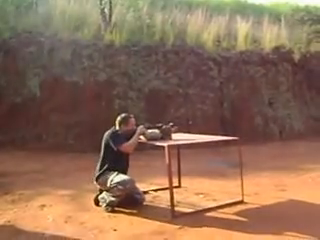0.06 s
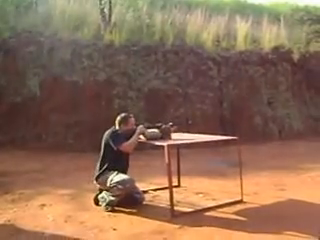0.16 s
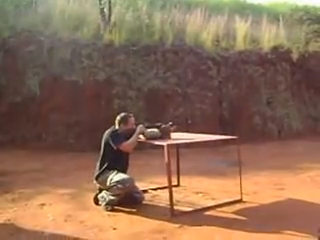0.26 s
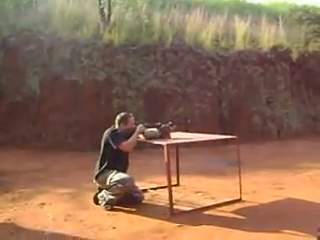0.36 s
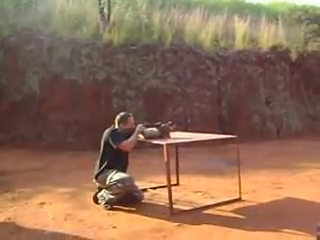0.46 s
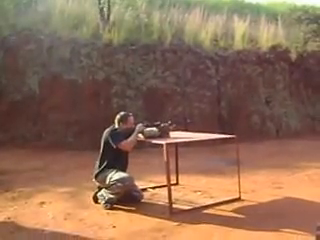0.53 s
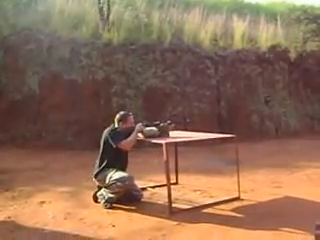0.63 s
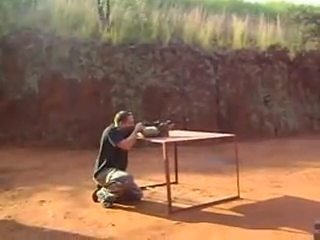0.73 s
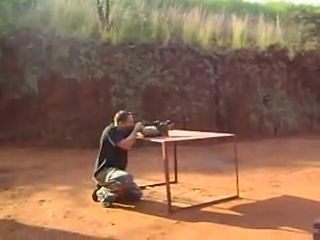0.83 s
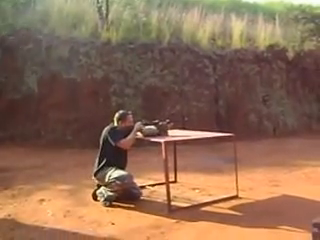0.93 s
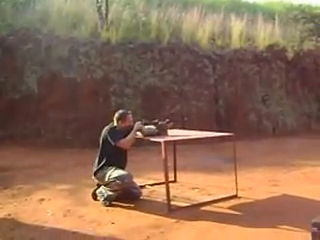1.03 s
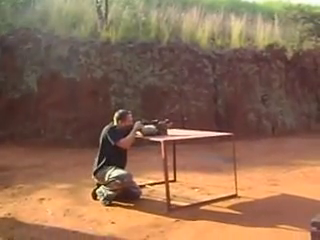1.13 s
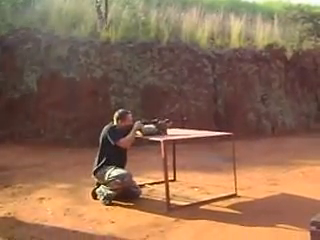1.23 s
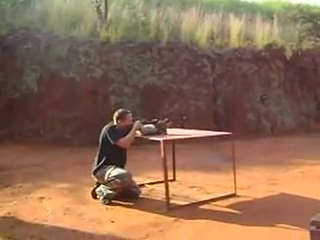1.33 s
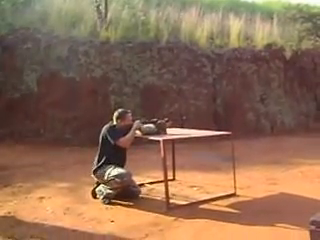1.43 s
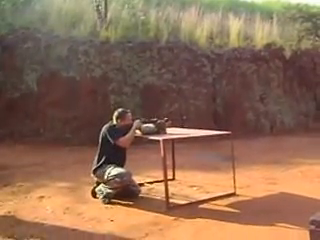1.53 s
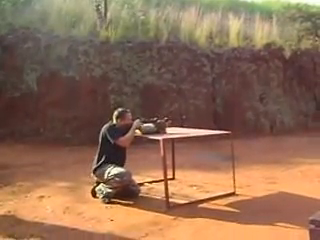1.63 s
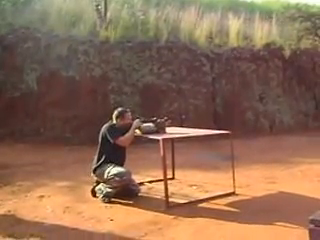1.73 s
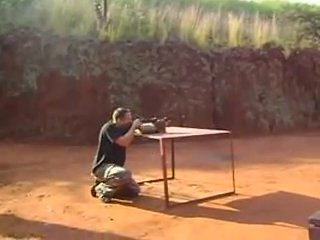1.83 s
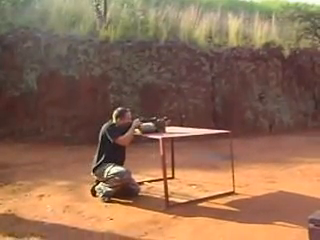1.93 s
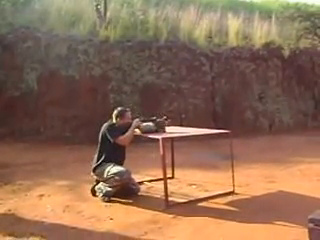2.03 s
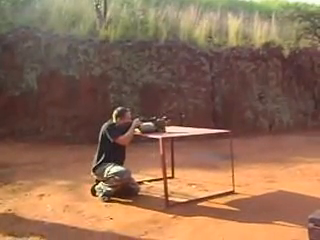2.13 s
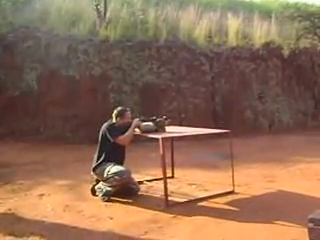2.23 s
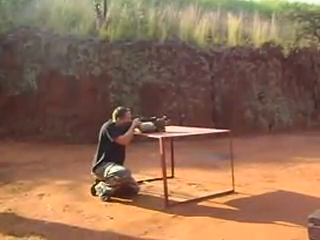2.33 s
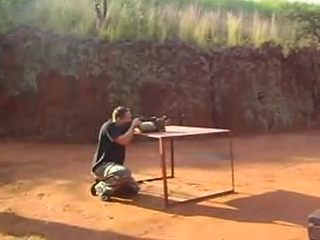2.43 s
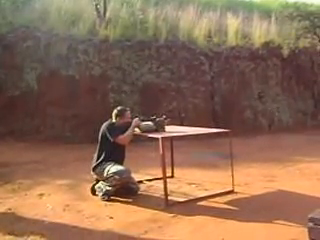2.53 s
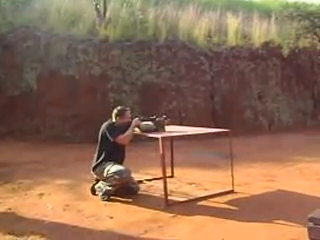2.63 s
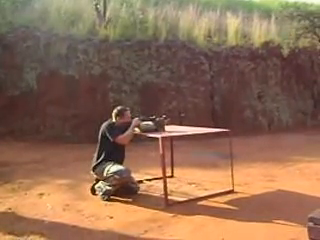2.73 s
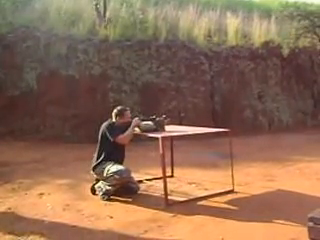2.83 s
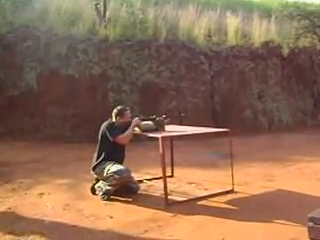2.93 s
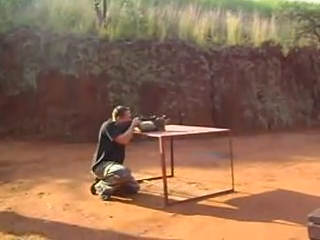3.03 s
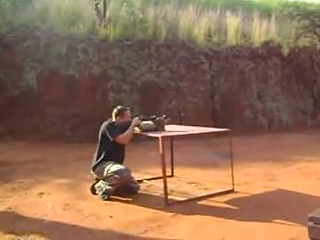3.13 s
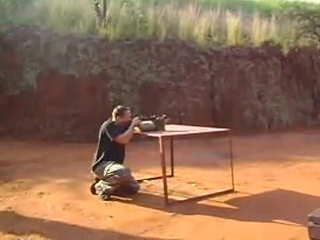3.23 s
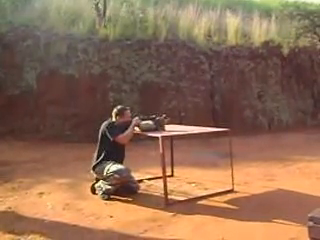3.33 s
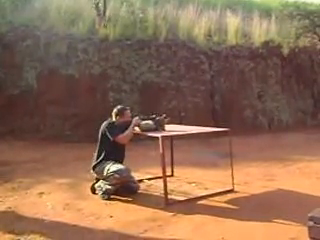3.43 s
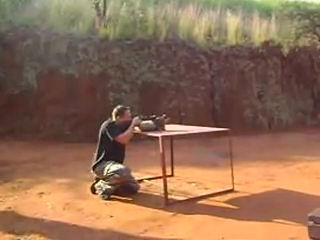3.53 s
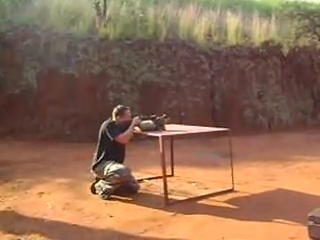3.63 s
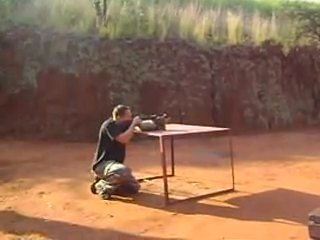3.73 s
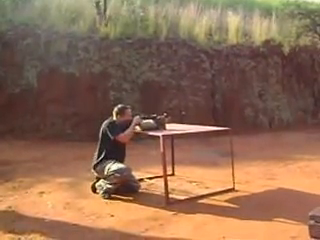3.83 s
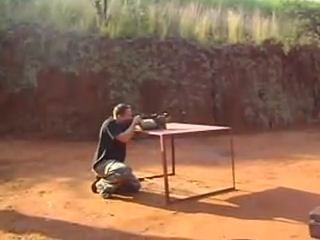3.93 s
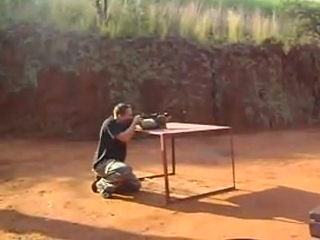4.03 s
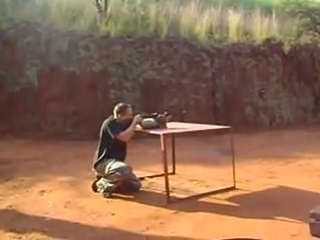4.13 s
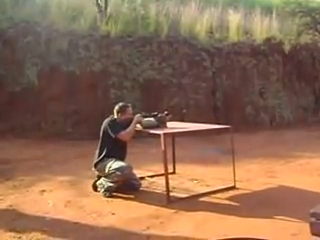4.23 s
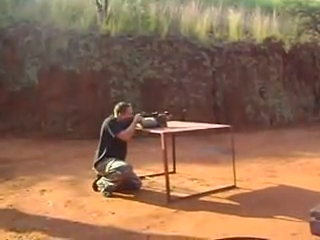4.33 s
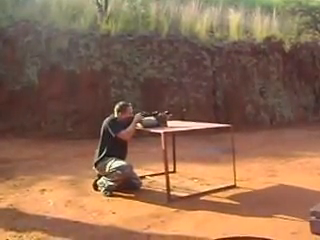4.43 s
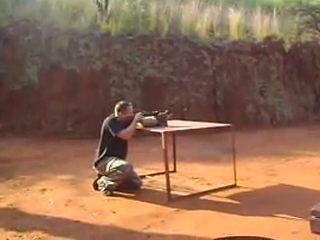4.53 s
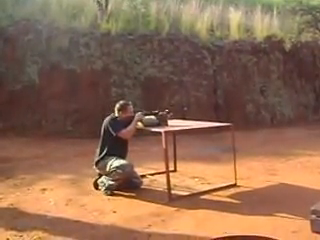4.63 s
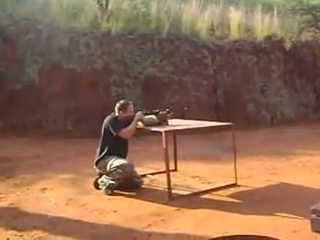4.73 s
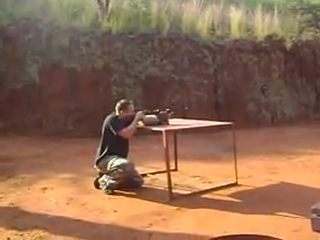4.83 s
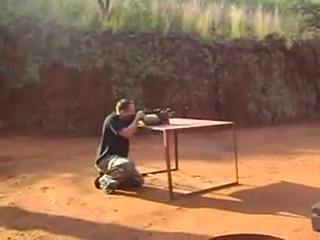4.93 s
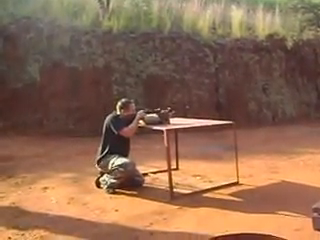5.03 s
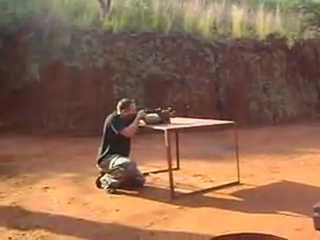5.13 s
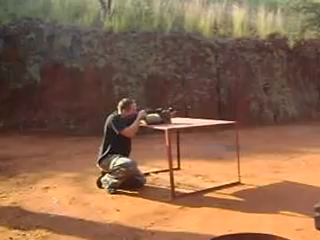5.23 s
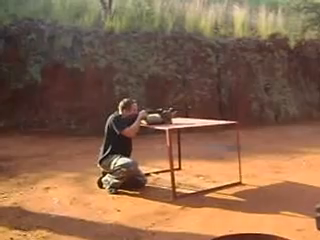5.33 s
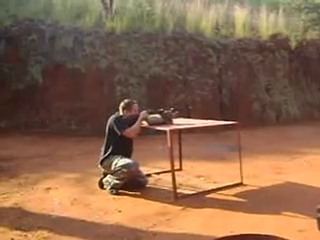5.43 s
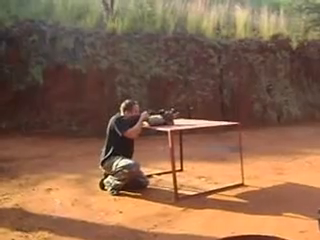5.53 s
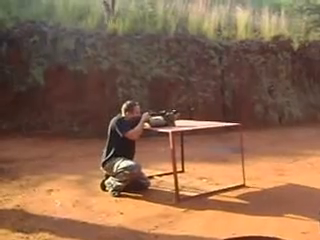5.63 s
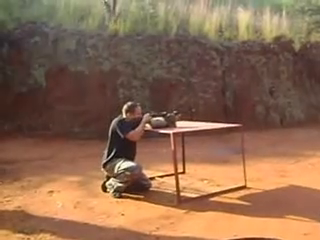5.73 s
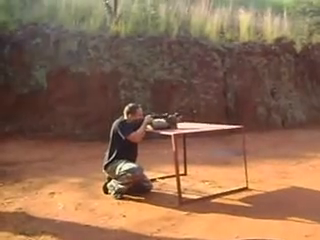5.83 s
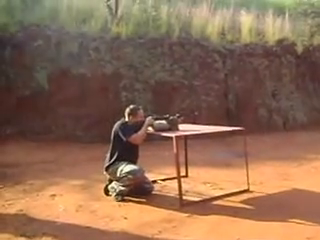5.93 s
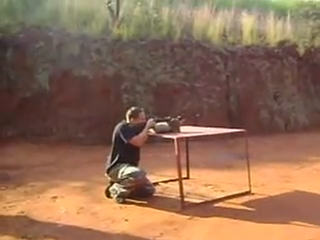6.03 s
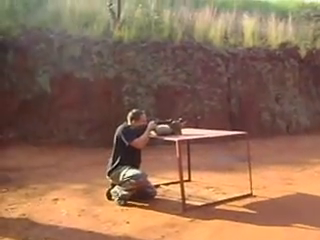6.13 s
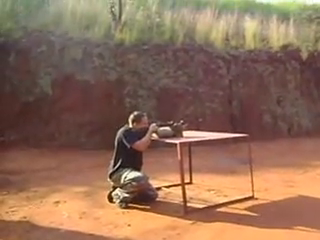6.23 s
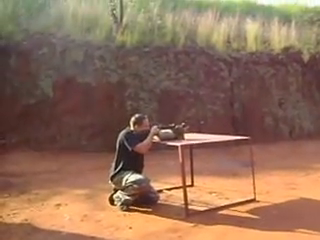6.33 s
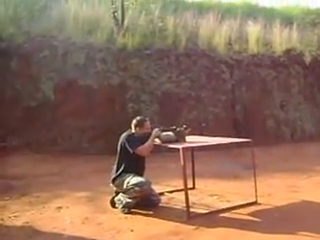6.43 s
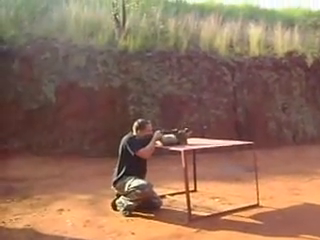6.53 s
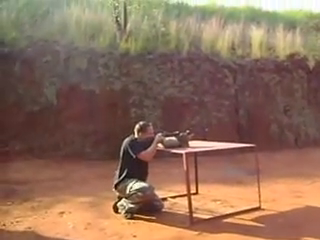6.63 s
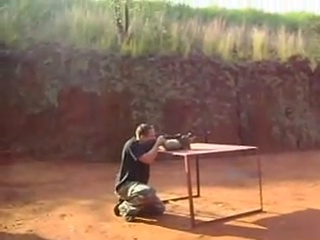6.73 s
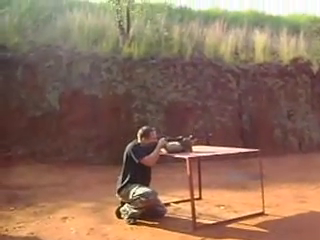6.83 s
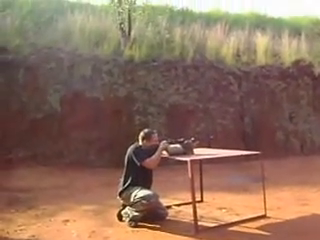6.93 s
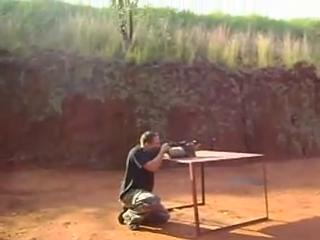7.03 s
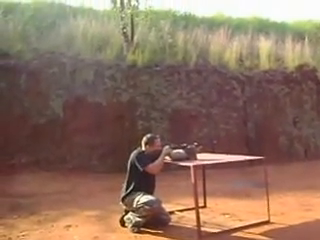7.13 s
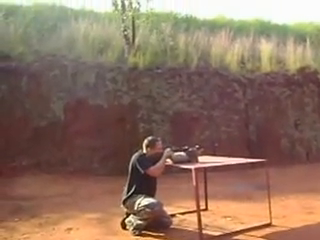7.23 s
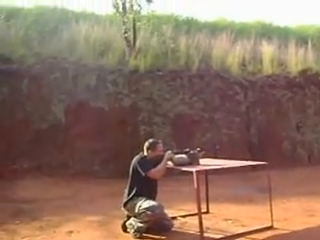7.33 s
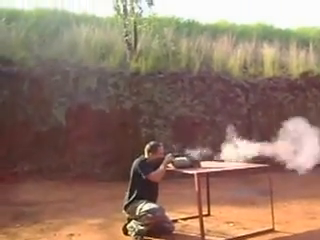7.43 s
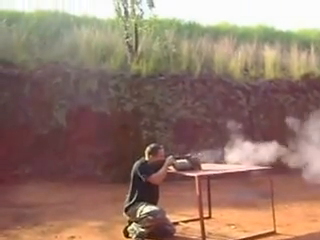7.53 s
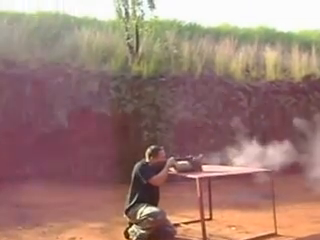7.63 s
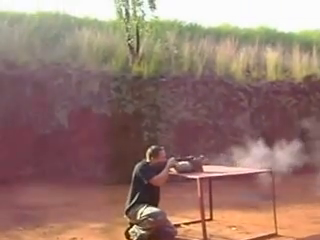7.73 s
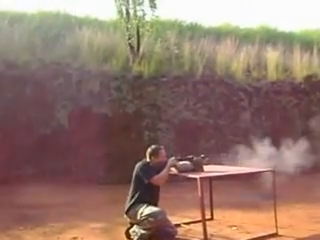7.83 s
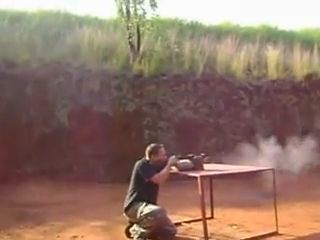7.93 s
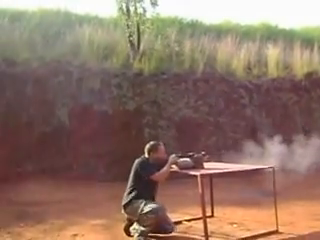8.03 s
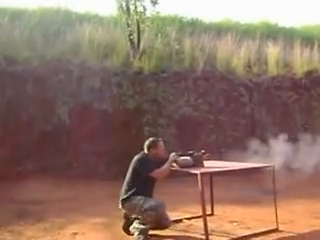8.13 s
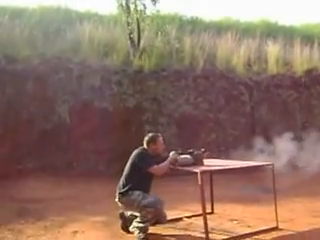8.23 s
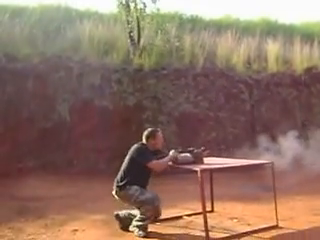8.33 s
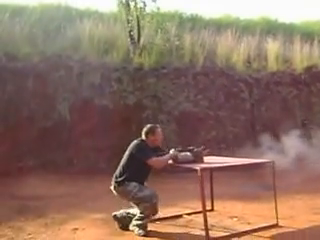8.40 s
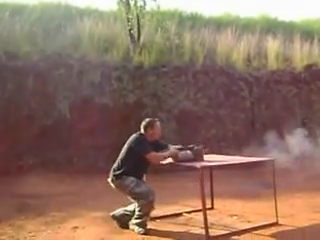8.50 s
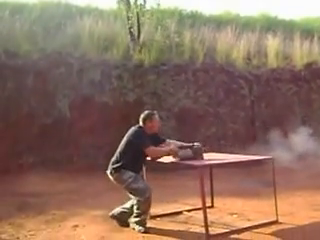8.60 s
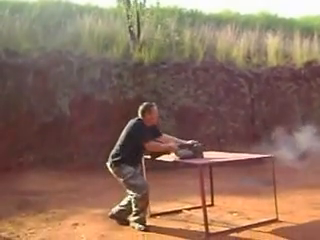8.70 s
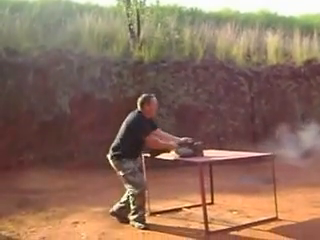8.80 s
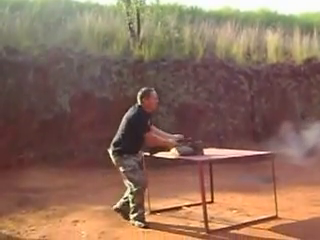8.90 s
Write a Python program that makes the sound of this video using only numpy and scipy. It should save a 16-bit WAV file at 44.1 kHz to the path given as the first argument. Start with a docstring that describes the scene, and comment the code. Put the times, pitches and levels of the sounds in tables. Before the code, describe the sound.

Outdoors, soft steady hiss with a far-off dove repeating a three-part coo about every one and a half seconds. A brief dry chuff sounds close by at the start. After a long quiet wait, one black-powder rifle shot bursts out extremely loud, clipped by a small narrow-band microphone, with tight echoes off an earth bank and a rolling boom that dies away. Dull scuffs follow as the shooter rises.

```python
"""A far-off dove coos over steady hiss, and a short dry chuff sounds near the start.
Then a black-powder rifle is fired once on an open range in front of a high earth bank, and its boom rolls
over the land; scuffing follows as the shooter gets up. Coos are frequency-modulated sines, the chuff and
scuffs are shaped noise, and the shot sums pressure fronts, scattered noise and resonances.
The blast and its echoes overload a small, narrow-band microphone input."""
import sys
import numpy as np
from scipy import signal
from scipy.fft import rfft, irfft, next_fast_len
from scipy.io import wavfile

SR = 44100
rng = np.random.default_rng(int(sys.argv[2]) if len(sys.argv) > 2 else 0)


def generate_wav(signal):
    """Clip the signal to [-1, 1] and save it as 16-bit WAV at the path in sys.argv[1]."""
    frames = np.transpose(np.atleast_2d(signal))
    scaled = np.clip(frames, -1, 1) * 32767
    pcm = np.round(scaled).astype(np.int16)
    wavfile.write(sys.argv[1], SR, pcm)


N = 395224   # length in samples

# Spectrum of still air and microphone hiss. Each row: frequency in Hz, relative density in dB per Hz.
HISS_SPECTRUM = [(25, 5), (70, 6.5), (130, -2), (250, 0.5), (500, 0.5), (820, 3.5), (1300, -0.5),
                 (2500, -2.5), (4800, -4), (5400, -10), (6200, -10.5)]
HISS_DB = -63.5
# Spectrum of the low drone. Each row: frequency in Hz, relative density in dB per Hz.
DRONE_SPECTRUM = [(50, -24.5), (63, -17), (70, 11), (79, -13), (97, 0), (115, -18), (160, -35.5)]
# Swells of the drone. Each row: crest in seconds, half width (to 1/e) in seconds, level in dB.
DRONE_SWELLS = [(.1, 0.77, -80), (3.8, 0.96, -75), (6.15, 0.34, -76.5)]

# The dove's phrases. Each row: starts of long coo, rolled note and short coo in seconds, level in dB.
DOVE_PHRASES = [(-.38, 0.055, .555, -60.5), (1.024, 1.471, 1.961, -58), (2.438, 2.859, 3.334, -58),
                (3.81, 4.247, 4.734, -57.5), (5.236, 5.64, 6.142, -56.6), (6.633, 7.086, 7.6, -56),
                (8.047, 8.485, 8.97, -58.5)]
# The plain notes are arches in pitch: length, top, fall at the end.
LONG_COO_S, LONG_TOP_HZ, LONG_FALL_HZ = .102, 912, 211
SHORT_COO_S, SHORT_TOP_HZ, SHORT_FALL_HZ = .066, 858, 110
# The rolled note lasts until a brief pause before the short coo.
PURR_HZ, PURR_PAUSE_S = 885, .095
PURR_DB, SHORT_COO_DB = -0.1, 1.6   # relative to the phrase
PITCH_RISE_PER_S = .005   # share by which the song creeps up in pitch, phrase by phrase

# Spectrum of the dry chuff close by. Each row: frequency in Hz, relative density in dB per Hz.
CHUFF_SPECTRUM = [(150, -36), (320, -25), (490, -6.5), (610, -10.5), (780, 2.5), (930, -1.5), (1050, -9.5),
                  (1280, -16.5), (1580, -2), (2500, -8), (2850, -13), (3700, -12), (5200, -13.5),
                  (6300, -21)]
# Thin metallic ring that outlasts the chuff. Each row: frequency in Hz, relative density in dB per Hz.
CHUFF_RING_SPECTRUM = [(2800, -35), (3080, -25), (3180, -3), (3300, -18), (3700, -7), (3850, -4),
                       (4100, -22), (4800, -35)]
# The chuff sets in quickly, holds and dies away.
CHUFF_S, CHUFF_DB, CHUFF_ATTACK_S, CHUFF_HOLD_S, CHUFF_T60_S = 0.15, -32.5, 0.0042, 0.024, 0.23

# Sound scattered by the bank. Each row: frequency in Hz, relative density in dB per Hz.
SCATTER_SPECTRUM = [(25, -15.5), (70, -20), (140, 4), (230, 1), (330, 2), (460, -3), (720, 3.5), (1200, 0),
                    (1550, -5), (2000, -6), (2800, -11), (4700, -14.5), (6000, -24.5)]
# Booming modes of the hollow between bank and ground. Each row: frequency in Hz, relative level in dB,
# decay time t60 in seconds.
HOLLOW_MODES = [(134, -7, 0.33), (171, -2, 0.29), (214, 2.5, 0.29), (316, -10.5, 0.38)]
# The muzzle blast and the time its scatter takes to die.
SHOT_S, SHOT_DB, SHOT_T60_S = 7.525, 10.5, 0.42
# Returns of the blast from the bank and a far wall. Each row: arrival in seconds, level in dB.
ECHOES = [(7.567, 8), (7.5975, -1.1), (7.622, -1.3), (7.663, -2.5), (7.6823, -5), (7.694, -5),
          (7.758, -18.5)]
ECHO_T60_S, ECHO_BASS_T60_S = .058, .17
# Every arrival has a front and a boom, in proportion to its strength.
FRONT_DB, FRONT_S, BOOM_DB = 9.5, .00024, -12.5
# Relative bass of the direct blast, and how its share grows with the delay of a return.
BASS_DB, BASS_DB_PER_S = -6, 50.5

# Spectrum of the far rolling boom. Each row: frequency in Hz, relative density in dB per Hz.
ROLL_SPECTRUM = [(25, -8), (70, -10.5), (130, -10), (220, -4.5), (330, -4), (560, -6), (820, 2),
                 (1100, -2.5), (1500, -8), (1850, -5.5), (2600, -9.5), (4500, -13), (6000, -24)]
# Boom from the land around: lag behind the shot, swell, decay, level.
ROLL_LAG_S, ROLL_RISE_S, ROLL_T60_S, ROLL_DB = 0.12, .017, 1.251, -18

# The clearest scuffs as the shooter rises. Each row: start in seconds, level in dB.
CLEAR_SCUFFS = [(8.405, -47), (8.427, -46.5), (8.452, -46), (8.485, -44), (8.499, -45)]
# Spectrum of the scuffs. Each row: frequency in Hz, relative density in dB per Hz.
SCUFF_SPECTRUM = [(100, -10), (400, -16), (620, -5), (830, 4.5), (1050, -4.5), (1450, -13.5), (1850, -5.5),
                  (2300, -27), (3200, -24), (5000, -46)]
SCUFF_T60_S = 0.17
SMALL_SCUFFS_PER_S, SMALL_SCUFF_DB = 19, -58   # lighter scuffs, mean rate and mean level

CUTOFF_HZ = 15700   # upper limit of the finished sound


def from_db(db):
    """A level in decibels is twenty times the logarithm of an amplitude ratio."""
    return 10 ** (np.asarray(db) / 20)


def rms_one(x):
    """Normalization: dividing by the root mean square gives unit rms."""
    return x / np.sqrt(np.mean(x ** 2) + 1e-20)


def clock():
    """Uniform sampling: the time of every sample in seconds."""
    return np.arange(N) / SR


def add(track, start, sound):
    """Superposition: a sound sums into the track from a time in seconds; what falls outside is dropped."""
    i = round(start * SR)
    sound, i = sound[max(-i, 0):], max(i, 0)
    track[i:i + len(sound)] += sound[:max(N - i, 0)]


def butter(x, edge_hz, kind, order=2):
    """Causal Butterworth filtering: a maximally flat passband with a smooth roll-off."""
    sections = signal.butter(order, edge_hz, kind, fs=SR, output="sos")
    return signal.sosfilt(sections, x + 1e-18)


def noise(spectrum):
    """Spectral shaping: white noise weighted in frequency gives steady coloured noise of unit rms."""
    hz, db = np.transpose(spectrum)
    size = next_fast_len(N)
    bins = np.maximum(np.arange(size // 2 + 1) * SR / size, 1)
    gain = from_db(np.interp(np.log(bins), np.log(hz), db)) * (bins > 15)
    # steep roll-off above the last listed frequency
    gain = gain / (1 + (bins / hz[-1] / 1.15) ** 16)
    return rms_one(irfft(rfft(rng.standard_normal(size)) * gain)[:N])


def dying(start, t60, rise):
    """Exponential decay: an envelope swells from a start time and then loses 60 dB in each t60."""
    out, age = np.zeros(N), np.arange(2 * SR) / SR
    decay = np.exp(-np.minimum(np.log(1000) * age / t60, 40))
    add(out, start, (1 - np.exp(-age / rise)) * decay)
    return out


def held(start, attack, hold, t60):
    """Sustained excitation: an envelope with a quick attack, a hold and an exponential release."""
    age = np.maximum(clock() - start, 0)
    release = from_db(-60 * np.clip((age - hold) / t60, 0, 4))
    return (1 - np.exp(-age / attack)) * release


def air():
    """Random background: steady broadband hiss, and a low drone under Gaussian swells."""
    swells = sum(from_db(db) * np.exp(-((clock() - crest) / width) ** 2)
                 for crest, width, db in DRONE_SWELLS)
    return from_db(HISS_DB) * noise(HISS_SPECTRUM) + noise(DRONE_SPECTRUM) * swells


def coo(length, top_hz, fall_hz, rise_hz=135, crest=.42, edge=.008):
    """Frequency modulation: the pitch of a nearly pure tone climbs to a crest and sinks again."""
    age = np.arange(int(length * SR)) / SR
    along = age / length
    climb = rise_hz * (1 - along / crest) ** 2
    fall = fall_hz * ((along - crest) / (1 - crest)) ** 2
    hz = top_hz - np.where(along < crest, climb, fall)
    swell = np.sin(np.pi / 2 * np.clip(np.minimum(age, length - age) / edge, 0, 1)) ** 2
    return np.sqrt(2) * swell * np.sin(2 * np.pi * np.cumsum(hz) / SR)


def purr(length, pitch_hz, arch_hz=70, uneven_db=1.0, accent_db=0.8, body_hz=760, body_db=6.0):
    """Excited resonance: quick swoops in pitch, each knocking the throat, make a rolled note."""
    pulses_per_s, pulse_length, jitter = 35.5, .019, .0018   # lengths in seconds
    out = np.zeros(int((length + .05) * SR))
    chance = rng.standard_normal((40, 3))
    ages = np.arange(0, length - pulse_length / 2, 1 / pulses_per_s)
    for age, (late, loud, sharp) in zip(ages, chance):
        # the roll starts firmly and rides on a flat arch in pitch
        hz = pitch_hz + arch_hz * np.sqrt(np.sin(np.pi * age / length)) + 20 * sharp
        pulse_db = accent_db * np.exp(-age / 0.045) + uneven_db * loud
        pulse = coo(pulse_length, hz, fall_hz=300, rise_hz=380, crest=.55, edge=.004)
        add(out, age + jitter * late, from_db(pulse_db) * pulse)
    body = signal.lfilter(*signal.iirpeak(body_hz, 7, fs=SR), out)
    # sound leaves partly straight, partly through the resonance
    return (out + from_db(body_db) * body) / 2


def dove(throat_low_hz=680):
    """Radiation from a resonant throat: a long coo, a rolled note and a short coo, stripped of bass."""
    out = np.zeros(N)
    for long_at, purr_at, short_at, db in DOVE_PHRASES:
        pitch = 1 + PITCH_RISE_PER_S * long_at
        long_coo = coo(LONG_COO_S, pitch * LONG_TOP_HZ, LONG_FALL_HZ)
        rolled = purr(short_at - purr_at - PURR_PAUSE_S, pitch * PURR_HZ)
        short_coo = coo(SHORT_COO_S, pitch * SHORT_TOP_HZ, SHORT_FALL_HZ)
        add(out, long_at, from_db(db) * long_coo)
        add(out, purr_at, from_db(db + PURR_DB) * rolled)
        add(out, short_at, from_db(db + SHORT_COO_DB) * short_coo)
    # the swollen throat radiates little below its resonance
    return butter(out, throat_low_hz, "high", order=6)


def far_off(x, echo_db=-16, wet_db=-5.5, wash_hz=840):
    """Multipath: a ground reflection, an echo from the bank and a dull wash from the trees join the call."""
    ground_delay, bank_delay, wash_delay, t60 = .0048, .072, .025, .55   # seconds
    ground_db = -17
    age = np.arange(SR * 3 // 4) / SR
    wash = rng.standard_normal(len(age)) * np.exp(-np.log(1000) * age / t60)
    wash = wash / np.linalg.norm(wash)
    washed = butter(signal.fftconvolve(x, wash)[:N], wash_hz, "low", order=8)
    out = x.copy()
    # the ground path is about half a cycle out of step near the top of each note, and hollows it a little
    add(out, ground_delay, from_db(ground_db) * x)
    add(out, bank_delay, from_db(echo_db) * x)
    add(out, wash_delay, from_db(wet_db) * washed)
    return out


def chuff(ring_db=-46, ring_t60=0.35):
    """Transient noise: a short dry burst close by, with a faint high ring decaying in its wake."""
    ringing = from_db(ring_db) * noise(CHUFF_RING_SPECTRUM) * dying(CHUFF_S, ring_t60, .015)
    envelope = held(CHUFF_S, CHUFF_ATTACK_S, CHUFF_HOLD_S, CHUFF_T60_S)
    return from_db(CHUFF_DB) * noise(CHUFF_SPECTRUM) * envelope + ringing


def ring(x, hz, t60):
    """Damped resonance: a unit click sets a decaying sine of initial height 1 ringing."""
    r, w = from_db(-60 / (t60 * SR)), 2 * np.pi * hz / SR   # pole radius and angle
    return signal.lfilter([0, np.sin(w)], [1, -2 * r * np.cos(w), r * r], x + 1e-18)


def rifle(bass_edge_hz=360, rise=0.00056):
    """Blast wave and reflection: each front brings scatter from the rough bank and a boom from the hollow."""
    fronts, pushes, crack_power, bass_power = np.zeros((4, N))
    age = np.arange(SR // 20) / SR
    # a jump in pressure, then a shallow suction
    front = (1 - age / FRONT_S) * np.exp(-age / FRONT_S)
    arrivals = [(SHOT_S, SHOT_DB, SHOT_T60_S, SHOT_T60_S)]
    arrivals += [(start, db, ECHO_T60_S, ECHO_BASS_T60_S) for start, db in ECHOES]
    for start, db, t60, bass_t60 in arrivals:
        # the longer the path, the more of what returns is bass
        bass_db = db + BASS_DB + BASS_DB_PER_S * (start - SHOT_S)
        add(fronts, start, from_db(db + FRONT_DB) * front)
        add(pushes, start, from_db([bass_db + BOOM_DB]))
        # scatter from many places adds up in power
        crack_power += (from_db(db) * dying(start, t60, rise)) ** 2
        bass_power += (from_db(bass_db) * dying(start, bass_t60, rise)) ** 2
    scatter = noise(SCATTER_SPECTRUM)
    crack = butter(scatter, bass_edge_hz, "high", order=3) * np.sqrt(crack_power)
    bass = butter(scatter, bass_edge_hz, "low", order=3) * np.sqrt(bass_power)
    boom = sum(from_db(db) * ring(pushes, hz, t60) for hz, db, t60 in HOLLOW_MODES)
    return butter(fronts + crack + bass + boom, 54, "high", order=1)


def rolling_boom(patchy_db=0.4, air_hz=2200, dulling_db_per_s=14.0):
    """Air absorption: countless far echoes come in clumps and lose treble with the distance travelled."""
    boom = noise(ROLL_SPECTRUM)
    body = butter(boom, air_hz, "low", order=1)
    age = np.maximum(clock() - SHOT_S, 0)
    dulled = body + (boom - body) * from_db(-dulling_db_per_s * age)
    clumps = rms_one(butter(rng.standard_normal(N), 45, "low"))
    swell = dying(SHOT_S + ROLL_LAG_S, ROLL_T60_S, ROLL_RISE_S)
    return dulled * swell * from_db(ROLL_DB + patchy_db * clumps)


def scuffs(rise=0.0012, spread_db=2.0, rustle_db=-58, rustle_t60=4.95):
    """Friction noise: overlapping dull scrapes, then lighter ones, add in power over a soft rustle."""
    last_clear = CLEAR_SCUFFS[-1][0]
    small = []
    for k, (late, loud) in enumerate(rng.random((6, 2))):
        start = last_clear + (k + 1 + late - .5) / SMALL_SCUFFS_PER_S
        small.append((start, SMALL_SCUFF_DB + spread_db * (2 * loud - 1)))
    scrape_power = sum((from_db(db) * dying(start, SCUFF_T60_S, rise)) ** 2
                       for start, db in list(CLEAR_SCUFFS) + small)
    rustle = from_db(rustle_db) * dying(CLEAR_SCUFFS[0][0], rustle_t60, .03)
    return noise(SCUFF_SPECTRUM) * np.sqrt(scrape_power + rustle ** 2)


def scene():
    """Superposition of the shot and the quiet range around it, in mono."""
    return (air() + far_off(dove()) + chuff() + rifle() + rolling_boom() + scuffs())[None]


def record(dry, input_top=0.86, band_hz=5700):
    """Overload: the input clips, the narrow band rounds the flat tops, and their overshoot clips again."""
    narrow = butter(np.clip(dry, -input_top, input_top), band_hz, "low", order=10)
    narrow = signal.sosfilt(signal.ellip(8, .2, 70, 6700, fs=SR, output="sos"), narrow)
    clipped = np.clip(narrow, -1, 1)   # full scale
    return signal.sosfilt(signal.ellip(10, .1, 70, CUTOFF_HZ, fs=SR, output="sos"), clipped)


dry = scene()
out = record(dry)
generate_wav(out)
```